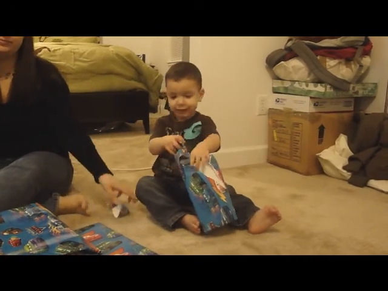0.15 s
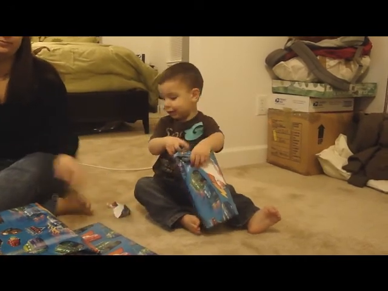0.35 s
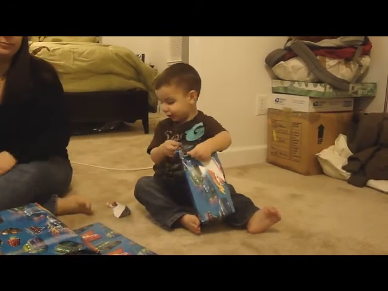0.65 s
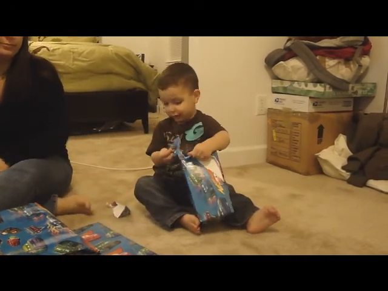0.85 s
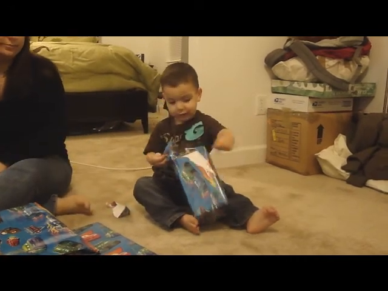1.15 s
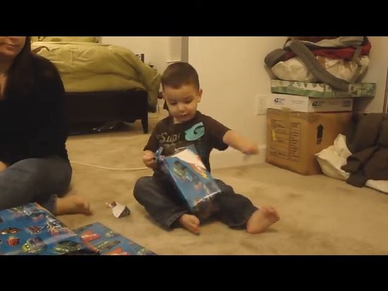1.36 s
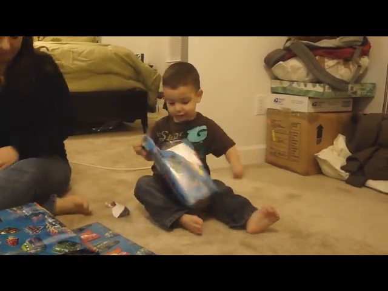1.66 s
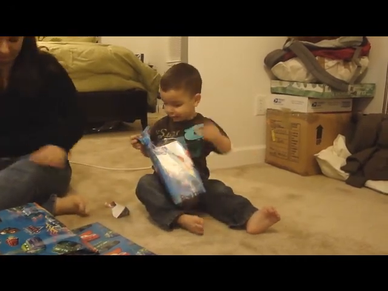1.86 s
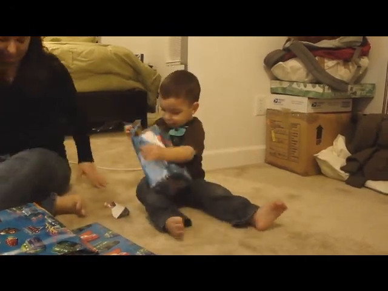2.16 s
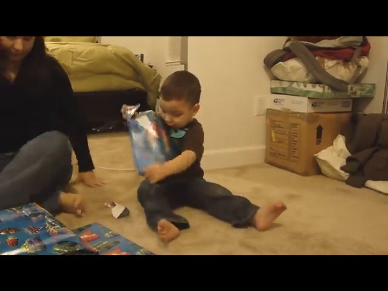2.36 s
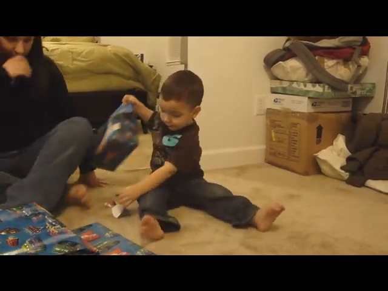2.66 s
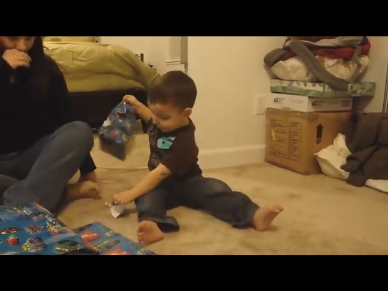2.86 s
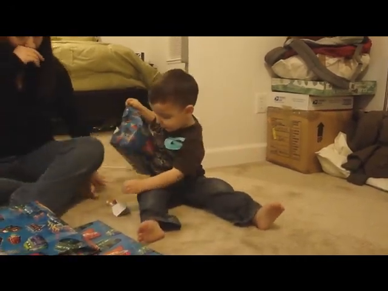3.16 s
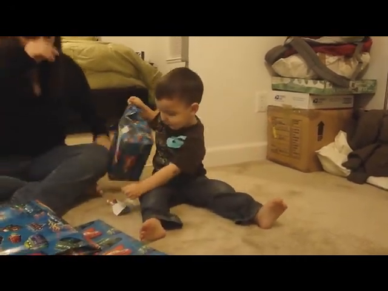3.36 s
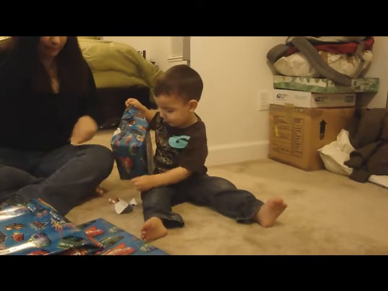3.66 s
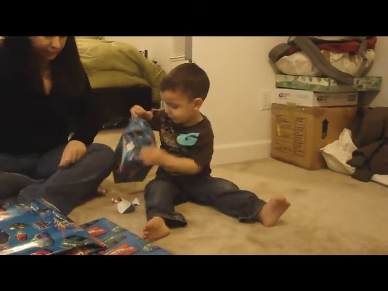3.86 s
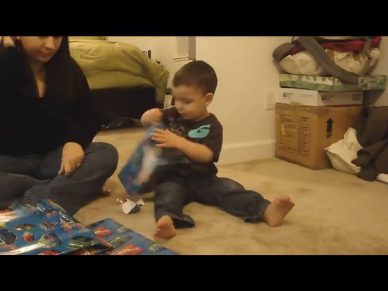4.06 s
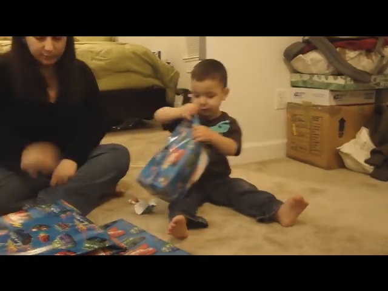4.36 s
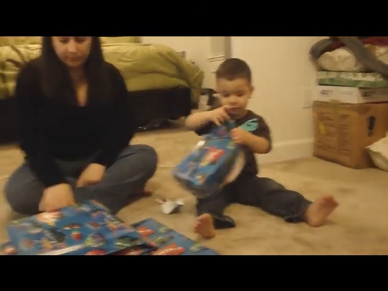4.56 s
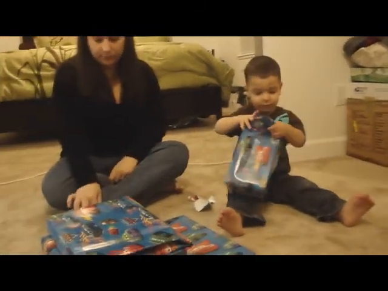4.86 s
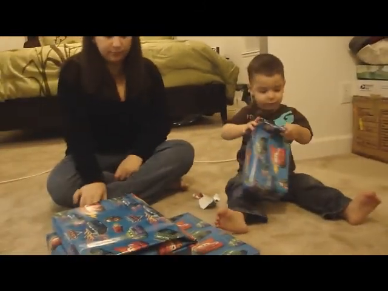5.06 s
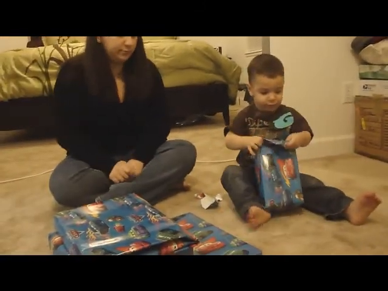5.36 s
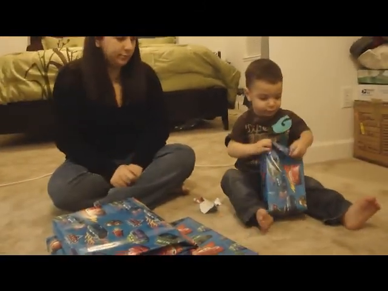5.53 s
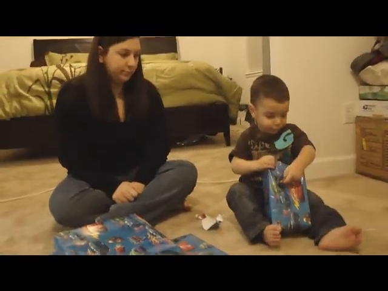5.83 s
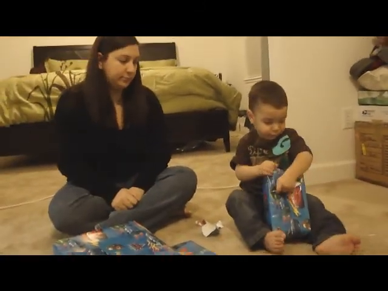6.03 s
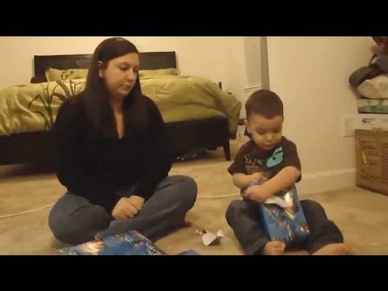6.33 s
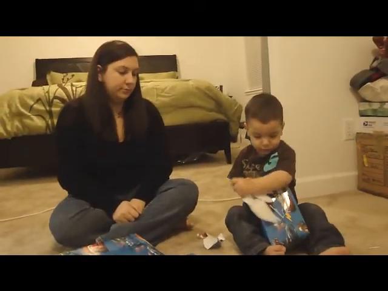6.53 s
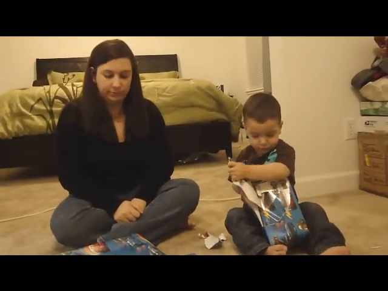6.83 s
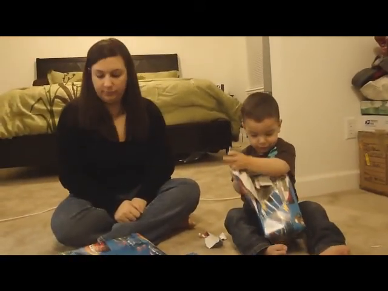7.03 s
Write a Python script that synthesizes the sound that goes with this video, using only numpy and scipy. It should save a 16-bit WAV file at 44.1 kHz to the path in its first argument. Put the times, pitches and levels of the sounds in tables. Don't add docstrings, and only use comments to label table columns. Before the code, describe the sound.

Close, dry crackling of wrapping paper on a box, with dull cardboard knocks, a calmer middle and loud tearing near the end.

```python
import sys
import numpy as np
from scipy import signal
from scipy.fft import rfft, irfft
from scipy.io import wavfile
from scipy.ndimage import uniform_filter1d

SR = 44100
rng = np.random.default_rng(int(sys.argv[2]) if len(sys.argv) > 2 else 0)


def natural_amplitude(level_db):
    exponent = np.asarray(level_db, float) / 20
    return 10 ** exponent


def put_to_file(sound):
    columns = np.atleast_2d(sound).T
    safe = np.clip(columns, -1, 1)
    whole_steps = np.round(safe * 32767)
    wavfile.write(sys.argv[1], SR, whole_steps.astype(np.int16))


N = 317079
EDGE_HZ = 11035


def evened(x):
    return x / np.sqrt(np.mean(x ** 2) + 1e-20)


def read(points, hz):
    f, value = np.transpose(points)
    return np.interp(np.log(hz + 1), np.log(f + 1), value)


def coloured(x, spectrum):
    gain = natural_amplitude(read(spectrum, np.fft.rfftfreq(len(x), 1 / SR)))
    return irfft(rfft(x) * gain, len(x))


def add(mix, start_s, sound):
    part = mix[max(round(start_s * SR), 0):][:len(sound)]
    part += sound[:len(part)]


def causal(gain):
    log_gain = np.log(np.concatenate([gain, gain[-2:0:-1]]) + 1e-5)
    return np.fft.ifft(np.exp(np.conj(signal.hilbert(log_gain)))).real


def hump(f, hz, octaves):
    return np.exp(-.5 * (np.log2((f + 1) / hz) / octaves) ** 2)


# frequency_hz, density_db (per Hz)
AIR = [(15, -57), (25, -20), (96, -5), (182, -3.5), (492, -4), (1080, -1), (1400, -8.5), (2710, -5),
       (4070, -6.5), (9440, -15), (11000, -17.5), (14300, -51), (22000, -120)]


def room_air():
    return natural_amplitude(-53.5) * evened(coloured(rng.standard_normal(N), AIR))


# peak_s, build_up_s (per 10 dB), let_go_s (per 10 dB), effort_db, coarseness_db
GRABS = [(0.059, 8, 0.17, -40.5, 0.5), (0.248, 0, 0.05, -39.5, -1), (0.344, 0, 0.09, -29.5, -8),
         (.5, 0.5, 0.19, -41.5, 1), (0.739, 0.05, 0.16, -38.5, 0.5), (.83, -0.5, 0.15, -41, -8),
         (0.951, 0.1, 0.12, -42.5, 6.5), (1.068, 0.02, 0.024, -25, -1),
         (1.231, 0.35, -0.23, -42, 1.5), (1.35, 0.3, 0.15, -49, 5), (1.56, 0.13, -0.24, -47, -7),
         (1.656, -0.13, 0, -45.5, -30), (1.713, 0.14, -0.14, -48, 7.5), (1.87, 0.2, 0.1, -55.5, -8),
         (2.031, -0.5, 0.31, -43, -5), (2.18, 0.34, 0.28, -45.5, 2), (2.29, 0.15, 0.2, -43, 4.5),
         (2.509, 0.04, 0, -40.5, 4), (2.609, 0.15, 0.02, -45, 5), (2.77, 0.32, 0.13, -45, 0),
         (2.969, 0.13, 0.1, -50.5, 2), (3.042, -0.13, -0.07, -34, -2), (3.16, 0.3, 0.1, -47, 5.5),
         (3.36, 0.2, 0.1, -49, 0), (3.54, 0.02, 0.05, -44.5, 3),
         (3.68, 0.3, 0.2, -54.5, 1.5), (3.85, 0, 0.1, -52, 3), (4.105, -0.06, 0.2, -48.5, 2.5),
               (4.165, 0.05, 0.2, -48, 2), (4.29, -0.04, 0.42, -43, 5), (4.479, 0.03, 0.02, -38.5, 3),
               (4.72, 0.2, 0.14, -43.5, -22), (4.769, -0.43, 0.44, -51, 4), (4.881, 0.02, 0.34, -43, -3.5),
               (5.12, -0.24, 0.5, -46.5, 1), (5.369, 0.02, 0.3, -41, -3), (5.46, 0, 0.06, -46, 2),
               (5.514, -0.0748, 0.26, -32.5, -7), (5.621, 0.09, -0.04, -33, -5),
               (5.7, -0.08, -0.56, -40, -9), (5.819, -0.16, 0.35, -30, -9), (5.888, 0, 0.33, -35.5, -3),
               (6.129, -0.2, 0.23, -31.5, -5), (6.298, 0.02, 0.3, -30.5, -4),
               (6.471, 0.12, 0.27, -27, -9.5), (6.62, 0.17, 0.03, -28.5, -4), (6.78, 0.3, 0.09, -37, 0),
               (6.86, 0.1, 0.06, -44, 1), (6.975, 0.05, 0.06, -43, -5), (7.04, 0.06, 0.1, -39, -2),
               (7.124, 0.03, 2.5, -28.5, -6)]


def hands():
    grabs = np.transpose(GRABS)[:, :, None]
    peak, build, go, effort_db, coarse_db = grabs
    t = np.arange(0, N + 64, 64) / SR
    rising = (peak - t) / np.maximum(build, .005)
    falling = (t - peak) / np.maximum(go, .005)
    shape_db = -10 * np.where(t < peak, rising, falling)
    flap_db = -4.0 + 0.49 * coarse_db - 0.44 * (effort_db + 39)
    levels_db = []
    for db in (0 * flap_db, coarse_db, flap_db):
        power = (natural_amplitude(effort_db + db + shape_db) ** 2).sum(0)
        levels_db.append(np.interp(np.arange(N) / SR, t, 10 * np.log10(power + 1e-12)))
    return levels_db


def ring(hz, cycles, phase, size=500):
    u = np.arange(size) / SR * hz / cycles
    return u * np.exp(1 - u) * np.sin(2 * np.pi * (cycles * u + phase))


# frequency_hz, density_db (per Hz)
PAPER = [(59, -57), (100, -20), (325, -9), (512, -9), (674, -3.5), (837, -7.5), (1220, -2), (1420, -6),
         (2030, -2.5), (5310, -2), (11000, -6.5), (14300, -99), (22000, -120)]


def crackle(clumps_db, lo_hz, hi_hz, per_s, cycles, spread_db, count=14):
    chance = per_s * natural_amplitude(clumps_db) / SR
    size = natural_amplitude(spread_db * np.minimum(rng.exponential(1, N), 3.0))
    size = size * (rng.random(N) < chance) / np.sqrt(per_s)
    kind = rng.integers(0, count, N)
    out = np.zeros(N)
    for k, hz in enumerate(np.geomspace(lo_hz, hi_hz, count)):
        pop = ring(hz, cycles, rng.random())
        pop = pop / np.linalg.norm(pop) * np.sqrt(hz)
        out += signal.oaconvolve(size * (kind == k), pop)[:N]
    return evened(coloured(out, PAPER))


def rustle():
    fine_db, middle_db, broad_db = hands()
    per_s = 800 * natural_amplitude(.6 * (fine_db + 45))
    wander = uniform_filter1d(uniform_filter1d(rng.standard_normal(N), 200), 200)
    clumps_db = 2.8 * evened(wander)
    fine = crackle(clumps_db, 3740, 16000, per_s, cycles=0.46, spread_db=2.0)
    middle = crackle(clumps_db, 1176, 3800, 0.65 * per_s, cycles=0.4, spread_db=0.5)
    broad = crackle(.4 * clumps_db, 192, 1328, .9 * per_s, cycles=0.46, spread_db=4.0)
    return taut(natural_amplitude(fine_db + 1.0) * fine + natural_amplitude(middle_db + 0.5) * middle + natural_amplitude(broad_db + 0.5) * broad)


# frequency_hz, t60_s
WALLS = [(200, 0.3), (1000, 0.21), (4000, 0.17), (10000, 0.1)]
# delay_s, level_db
ECHOES = [(.0013, -6), (.0086, -19.5), (.013, -24), (0.028, -13.5), (0.049, -14)]


def tail():
    taps = np.zeros(SR // 2)
    at = np.arange(60, len(taps) - 20, 20)
    taps[at + rng.integers(0, 20, len(at))] = rng.choice([-1., 1.], len(at))
    hz, t, z = signal.stft(taps, SR, nperseg=256)
    dying = natural_amplitude(-60 * t / read(WALLS, hz)[:, None])
    out = signal.istft(z * dying, SR, nperseg=256)[1]
    out *= np.interp(np.arange(len(out)) / SR, [0, .006, .009], [.45, .45, 1])
    out *= natural_amplitude(-4.5) / np.linalg.norm(out)
    for delay_s, db in ECHOES:
        add(out, delay_s + rng.uniform(-.0006, .0006), natural_amplitude(db) * np.array([-.7, -.3]))
    return out


def room(x, count=16):
    place = (np.arange(N) / SR / .03) % count
    out = np.zeros(N)
    for k in range(count):
        distance = abs((place - k + count / 2) % count - count / 2)
        share = np.cos(np.pi / 2 * np.clip(distance, 0, 1))
        out += signal.fftconvolve(x * share, tail())[:N]
    return out


def crease(f, hz, octaves):
    core = hump(f, hz, max(1.215 * octaves, .15)) + natural_amplitude(-15) * hump(f, hz, 2.35)
    tilted = core * ((f + 300) / hz) ** 0.0066 + 0.0018
    return causal(tilted / (1 + (f / EDGE_HZ) ** 8))[:600]


# start_s, level_db (over 2
# ms), pitch_hz, spread_octaves
CREASES = [(0.034, -36.5, 2550, 0.54), (0.0565, -24, 3550, 0.5), (0.0619, -31, 2030, 0.77),
           (0.0669, -28, 5110, 1), (0.0859, -18, 5140, 0.81), (0.1798, -42, 2660, 0.71),
           (0.1845, -45, 4050, 0.77), (0.2511, -31.5, 2050, 1.6), (0.2993, -38, 3310, 0.51),
           (0.3186, -20.5, 3230, 0.48), (0.3519, -20.5, 2880, 0.56), (0.4373, -24.5, 2780, 1),
           (0.4649, -25, 4750, 0.63), (0.4695, -28, 4530, 0.29), (0.4901, -33, 4100, 0.43),
           (0.5005, -39, 2700, 0.69), (0.5259, -24.5, 3500, 1.3), (0.5356, -28, 2980, 1.04),
           (0.5833, -29.5, 3860, 1.4), (0.5924, -28.5, 4570, 0.24),
           (0.7135, -27, 4100, 0.48), (0.7485, -34, 6000, 0.5), (0.7562, -23, 3880, 0.62),
           (0.811, -22, 4500, 1.1), (0.8502, -27, 4160, 0.41), (0.861, -24.5, 2310, 1.8),
           (0.909, -19.5, 2800, 1.85), (0.9366, -22, 2620, 1.6), (0.9744, -22, 5100, 0.27),
           (1.0016, -30, 4710, 0.38), (1.05, -22, 3730, 0.93), (1.0563, -22, 6240, 1.5),
           (1.0824, -26, 6340, 0.35), (1.0904, -28, 4810, 0.94), (1.0931, -25, 4250, 1.3),
           (1.21, -35, 3490, 0.64), (1.2176, -32, 4700, 0.74), (1.222, -29, 4040, 0.34),
           (1.2353, -32.5, 2910, 1.2),
           (1.3137, -20.5, 5200, 0.35), (1.3418, -32.5, 4890, 0.79), (1.394, -40, 2130, 0.83),
           (1.3987, -37.5, 2660, 0.83), (1.4141, -36, 4010, 0.45), (1.5444, -29.5, 4490, 1.3),
           (1.5983, -38, 4650, 0.56), (1.6455, -28.0, 5900, 0.38), (1.673, -41, 3660, 1.4),
           (1.685, -26, 3100, 0.82), (1.7197, -28.5, 3900, 0.29), (1.729, -31, 1080, 0.74),
           (1.852, -30, 3670, 0.63), (1.8923, -39.5, 2480, 0.53), (1.9432, -34.5, 2930, 1.9),
           (1.99, -24.5, 4940, 0.62), (2.0023, -34, 5770, 0.45), (2.0166, -36, 3290, 0.83),
           (2.034, -26.5, 5290, 0.51), (2.043, -37, 4540, 0.92), (2.109, -38, 3450, 0.76),
           (2.135, -37, 3420, 1.09), (2.1493, -29.5, 5690, 0.61), (2.1625, -34.5, 4060, 1.7),
           (2.1824, -32, 3460, 1.1), (2.2815, -26, 1460, 0.94), (2.3244, -39, 2410, 1.37),
           (2.356, -33, 2980, 1.49), (2.3843, -30, 1530, 1.2), (2.5826, -49, 5430, 0.86),
           (2.594, -23, 2880, 0.16), (2.613, -34, 6310, 0.99), (2.6372, -25.5, 1970, 1.03),
           (2.687, -44, 6500, 0.8), (2.724, -35, 1840, 0.64), (2.743, -23.5, 4240, 1.3),
           (2.915, -40, 1380, 0.22), (2.9517, -41, 4290, 0.76), (2.9947, -29, 1140, 0.57),
           (3.027, -23, 4500, 0.75), (3.035, -33, 3430, 1.2), (3.0997, -38, 3890, 0.66),
           (3.1464, -34, 2660, 0.72), (3.1543, -37, 4750, 0.3), (3.1577, -37, 2090, 0.63),
           (3.1915, -34, 3560, 0.57), (3.2696, -35, 2050, 0.63), (3.301, -37, 4570, 0.58),
           (3.3256, -39, 3010, 0.72), (3.3521, -28.5, 1450, 0.79), (3.3585, -24.5, 1690, 0.22),
           (3.366, -32, 1260, 0.46), (3.4995, -44, 2120, 0.84), (3.505, -39, 2880, 0.62),
           (3.5128, -33.5, 2650, 0.62), (3.524, -30, 2500, 0.69), (3.5342, -26.5, 4630, 1.2),
           (3.669, -42, 1797, 1.19), (4.101, -44, 3430, 1), (4.107, -47, 3090, 0.72),
           (4.263, -32, 2700, 1.2), (4.2756, -26.5, 1380, 0.69), (4.2811, -22.5, 2305, 0.99),
            (4.2902, -31, 1650, 0.95), (4.3078, -27.5, 4550, 0.83), (4.3416, -33, 2470, 1.05),
            (4.3454, -36, 3940, 0.64), (4.4454, -34, 4210, 0.8), (4.4597, -21, 4550, 0.53),
            (4.4683, -26.5, 5140, 0.49), (4.5224, -30, 1305, 0.32), (4.5346, -32.5, 2300, 1.6),
            (4.5515, -29, 5400, 0.56), (4.5761, -28, 1480, 0.7), (4.621, -35.5, 1970, 1.51),
            (4.6272, -29.5, 2140, 1.3), (4.662, -33.5, 2170, 0.71), (4.667, -39.0, 2900, 1.5),
            (4.6949, -23.5, 3010, 1.55), (4.7046, -39, 2600, 0.56), (4.7071, -42, 3250, 1),
            (4.7575, -22, 2370, 0.67), (4.766, -36, 1610, 1.5),
           (4.8164, -39, 1840, 0.68), (4.8468, -23, 2090, 0.9), (4.873, -33, 4570, 0.36),
          (4.8852, -25.5, 2050, 0.85), (4.933, -38, 4060, 0.59), (4.9399, -27.5, 5130, 0.25),
          (4.9445, -31.5, 4030, 0.56), (5.011, -37, 2520, 0.6), (5.082, -36, 5270, 1.2),
          (5.0925, -32.5, 3690, 1.3), (5.1115, -32, 5080, 0.41), (5.1162, -31, 4070, 0.93),
          (5.124, -33, 3350, 0.53), (5.149, -28.5, 1680, 0.4), (5.1558, -27.5, 3480, 0.3),
          (5.1592, -32, 2740, 0.75), (5.1927, -36, 2250, 0.5), (5.2157, -39, 4300, 0.37),
          (5.266, -26.5, 5150, 0.83), (5.2732, -29, 2360, 0.31), (5.3187, -30, 3070, 1.8),
          (5.3498, -24.5, 1490, 0.67), (5.36, -26.5, 3120, 0.73), (5.3637, -28.5, 3180, 1.5),
          (5.4051, -35, 5160, 0.75), (5.4095, -35, 2120, 0.7), (5.4476, -29.5, 2810, 0.47),
          (5.4537, -31, 4610, 1.2), (5.4608, -27.5, 4250, 0.87), (5.4691, -27, 3910, 0.35),
           (5.5042, -28, 7500, 0.66), (5.522, -21, 3670, 1), (5.533, -25, 2600, 0.36),
           (5.5425, -22.0, 3990, 0.64), (5.5544, -24.5, 5410, 1), (5.596, -24.5, 4450, 1.3),
           (5.6008, -22, 3690, 0.56), (5.6414, -20, 2720, 0.64), (5.647, -20, 3440, 0.82),
           (5.6549, -24.5, 2870, 0.8), (5.666, -27, 3410, 0.64), (5.687, -36, 3580, 0.59),
           (5.6982, -26, 3700, 0.39), (5.7104, -25, 2520, 0.35), (5.7225, -23, 4050, 0.49),
           (5.7773, -33.5, 3110, 0.76), (5.7996, -32, 3070, 0.81), (5.8072, -12, 2500, 0.38),
           (5.811, -25, 4000, 0.5), (5.814, -36, 2130, 0.25), (5.84, -25, 3360, 0.86),
           (5.875, -26, 4570, 0.9), (5.8808, -22, 3170, 0.55), (5.885, -17.5, 3330, 0.6),
           (5.8888, -21, 3040, 0.63), (5.9081, -18, 2700, 0.33), (5.9157, -21.5, 3500, 0.73),
           (5.9863, -30, 2400, 0.76), (6.0024, -40, 1870, 0.79), (6.0121, -21.5, 2080, 0.58),
           (6.0272, -29.5, 2660, 0.46), (6.0345, -30, 3090, 1.1),
           (6.07, -36, 4360, 0.72), (6.0772, -48, 2670, 0.85), (6.122, -19.5, 2860, 0.46),
           (6.131, -26, 5500, 0.84), (6.1403, -25, 2420, 0.34), (6.1455, -24, 1660, 1.1),
           (6.164, -33, 4010, 0.73), (6.1789, -22, 3110, 0.85), (6.2206, -25, 2450, 0.51),
           (6.3004, -22, 3290, 0.61), (6.3582, -21, 4900, 0.54), (6.3871, -21, 5580, 0.6),
           (6.4883, -20, 6650, 0.47), (6.541, -18, 5300, 0.17), (6.5706, -26, 3370, 1.7),
           (6.6134, -24.5, 5180, 0.33), (6.6385, -23, 3850, 0.77), (6.6417, -23.5, 2630, 1.02),
           (6.677, -24, 4150, 0.72), (6.7084, -33, 4450, 0.86), (6.7425, -23, 4380, 0.51),
           (6.7484, -22, 5180, 1.02), (6.7516, -24, 5440, 1), (6.826, -28, 5800, 0.5),
           (6.8515, -34, 4180, 0.65), (6.8913, -30, 3520, 0.49), (6.897, -23, 5300, 0.4),
           (6.9052, -40, 4010, 0.9), (6.928, -30, 5200, 0.3), (6.953, -33.5, 3210, 0.98),
           (6.9563, -32.5, 2600, 1.1), (6.9684, -29, 2760, 0.39), (6.9821, -38, 5470, 0.73),
           (7.0026, -29, 3840, 1.3), (7.035, -25.5, 3030, 0.45), (7.0748, -25.5, 6100, 0.25),
           (7.1033, -35, 4540, 0.83), (7.1095, -23, 4660, 0.55)]


def snaps():
    out = np.zeros(N)
    f, t = np.fft.rfftfreq(1024, 1 / SR), np.arange(200) / SR
    creases = np.array(CREASES)
    chance = rng.standard_normal((len(creases), 200))
    chance[:, 16] += 2.5 * np.sign(chance[:, 16])
    breaking = t * np.exp(-t / .00038)
    z = rfft(chance * breaking, 1024)
    overall = np.sqrt(uniform_filter1d(abs(z) ** 2, size=37, axis=1))
    even = irfft(z / overall, 1024)[:, :200]
    for (start_s, db, hz, octaves), noise in zip(creases, even):
        crack = np.convolve(noise, crease(f, hz, octaves))
        crack = crack / np.linalg.norm(crack) * np.sqrt(0.0017 * SR)
        add(out, start_s - .0006, natural_amplitude(db - 1) * crack)
    return out


# start_s, length_ms, level_db, pitch_hz, spread_octaves
ZIPS = [(0.3073, 7.1, -26, 3300, 1.6), (.37, 9.3, -23, 3800, 1.46), (.804, 6.8, -27, 3280, 1.1),
        (.977, 4.3, -22, 4430, 1), (1.0108, 5, -20, 4800, 1), (1.0985, 3.5, -20.5, 6100, .35),
        (2.4995, 3.4, -32, 3180, 1.7), (2.7107, 3.4, -34, 2380, 0.96), (2.768, 5, -35, 3600, 1.2),
        (4.389, 8.3, -29.5, 2870, .9), (4.477, 7.4, -35.5, 2000, 1.1), (5.513, 5, -29, 3500, .8),
        (6.089, 4.3, -28.5, 5200, .9), (6.104, 8, -25.5, 3950, .8), (6.197, 3.8, -23.5, 6330, 0.83),
        (6.227, 4.5, -24, 5800, 1.2), (6.234, 4, -24, 4400, 1.3), (6.259, 7.4, -26, 3600, 0.76)]


def zips():
    out = np.zeros(N)
    f, ms = np.fft.rfftfreq(1024, 1 / SR), np.arange(900) / SR * 1000
    chance = rng.standard_normal((len(ZIPS), 2, 900))
    for (start_s, length_ms, db, hz, octaves), (noise, uneven) in zip(ZIPS, chance):
        length_ms = max(length_ms, 1)
        swell = np.sqrt(np.sin(np.pi * np.clip(ms / length_ms, 0, 1)).clip(0))
        ragged = natural_amplitude(4.5 * evened(uniform_filter1d(uneven, size=24)))
        run = np.convolve(noise * swell * ragged, crease(f, hz, octaves))
        run = run / np.linalg.norm(run) * np.sqrt(length_ms / 1000 * SR)
        add(out, start_s, natural_amplitude(db) * run)
    return out


# frequency_hz, density_db (per Hz)
BOX = [(40, -28), (200, 3.5), (400, 3.5), (1200, -6.5), (2000, -18.5), (4000, -8), (11000, -25.5)]
# start_s, peak_db, pitch_hz, t60_s
KNOCKS = [(0.372, -31, 443, 0.17), (1.006, -28, 477, 0.063), (1.712, -39, 700, 0.073),
          (1.997, -42, 312, 0.099), (3.351, -23, 630, 0.057), (3.358, -22.5, 1000, 0.045),
          (3.363, -30, 1680, 0.035), (3.43, -36.5, 304, 0.062), (3.841, -35.5, 564, 0.078),
          (4.277, -37, 593, 0.11), (4.479, -39, 603, 0.08), (4.756, -33.5, 692, 0.081),
          (5.226, -35.5, 227, 0.19), (5.345, -27, 720, 0.077), (5.854, -38, 353, 0.17),
          (6.129, -28, 700, 0.16), (6.374, -28.5, 657, 0.08)]


def knocks():
    out = np.zeros(N)
    f, t = np.fft.rfftfreq(4096, 1 / SR), np.arange(4096) / SR
    chance = rng.standard_normal((len(KNOCKS), 4096))
    for (start_s, db, hz, t60_s), noise in zip(KNOCKS, chance):
        body = causal(natural_amplitude(read(BOX, f)) * (1 + 3 * hump(f, hz, 0.2)))
        contact = 1 + 2.2 * np.exp(-t / .003)
        z = rfft(noise * natural_amplitude(-60 * t / t60_s) * contact)
        even = irfft(z / np.sqrt(uniform_filter1d(abs(z) ** 2, size=15)))
        knock = np.convolve(even, body[:1500])[:4096]
        add(out, start_s, natural_amplitude(db) * knock / abs(knock).max())
    return out


# start_s, end_s, pitch_hz, level_db
TAUT = [
    (0.672, 0.896, 950, 1.5),
    (5.5, 5.86, 2250, 0),
    (5.94, 6.293, 2300, -1),
    (6.28, 6.693, 4845, -12.5),
    (7.063, 7.25, 5000, -6.5),
]


def taut(x):
    f, t = np.fft.rfftfreq(N, 1 / SR), np.arange(N) / SR
    out = x.copy()
    for start_s, end_s, hz, db in TAUT:
        held = np.clip(np.minimum(t - start_s, end_s - t) / 0.02, 0, 1)
        out += irfft(rfft(x * held) * natural_amplitude(db) * hump(f, hz, 0.28), N)
    return out


def scene():
    air = room_air()
    sheet = rustle() * natural_amplitude(-4.5) + knocks()
    cracks = snaps() + zips()
    return (sheet + cracks + room(sheet + natural_amplitude(-1.5) * cracks) + air)[None]


def roll_off(x):
    return signal.sosfilt(signal.butter(12, 12230, fs=SR, output="sos"), x)


def record(dry):
    lopsided = dry + 0.16 * dry ** 2
    thin = signal.sosfilt(signal.butter(1, 70, "high", fs=SR, output="sos"), lopsided)
    pressed = 1.2 * np.tanh(thin / 1.2)
    band_limit = signal.firwin(181, EDGE_HZ, window=("kaiser", 6.5), fs=SR)
    limited = signal.oaconvolve(pressed, band_limit[None], "same")
    return roll_off(limited)


dry = scene()
out = record(dry)
put_to_file(out)
```